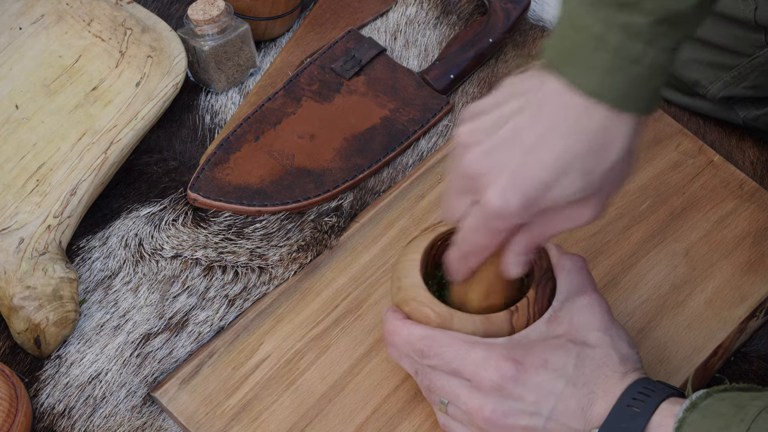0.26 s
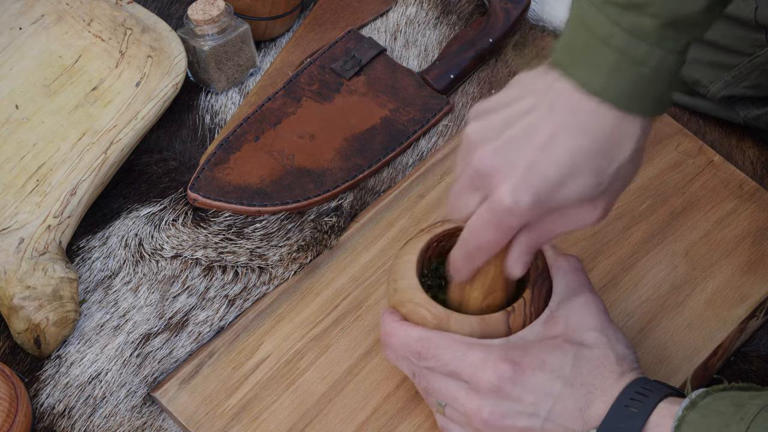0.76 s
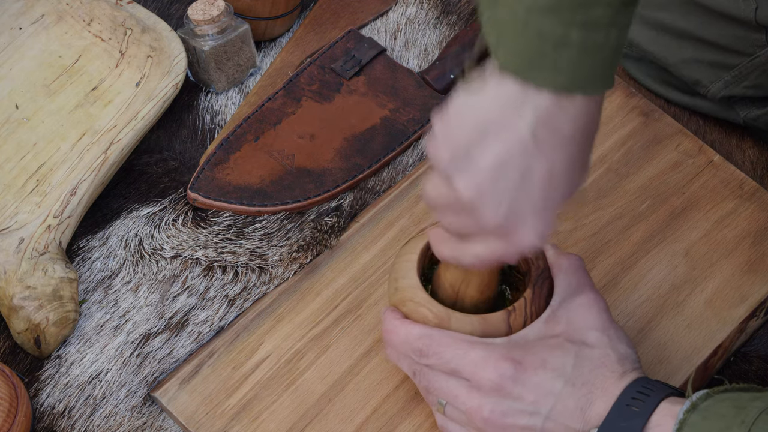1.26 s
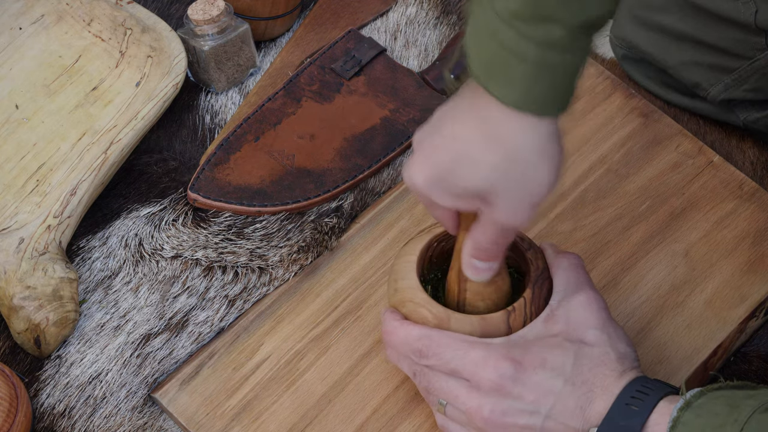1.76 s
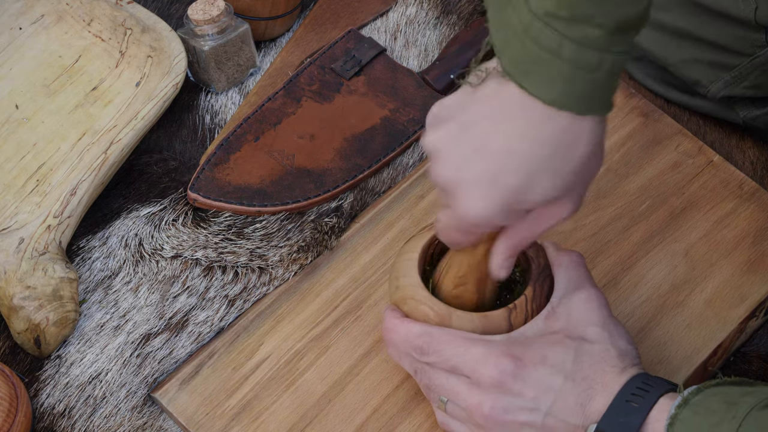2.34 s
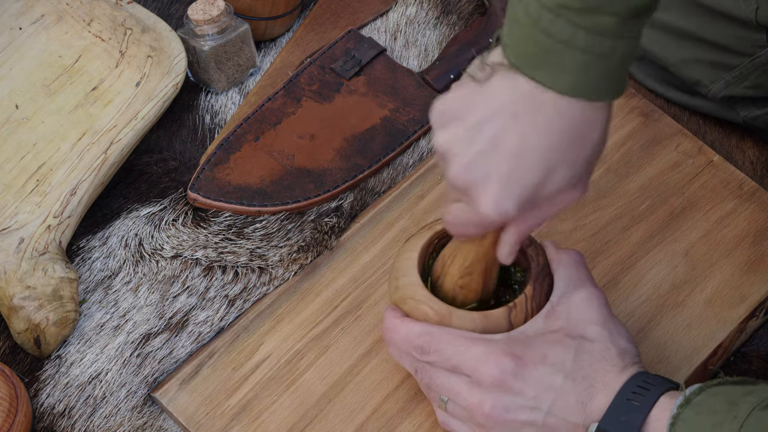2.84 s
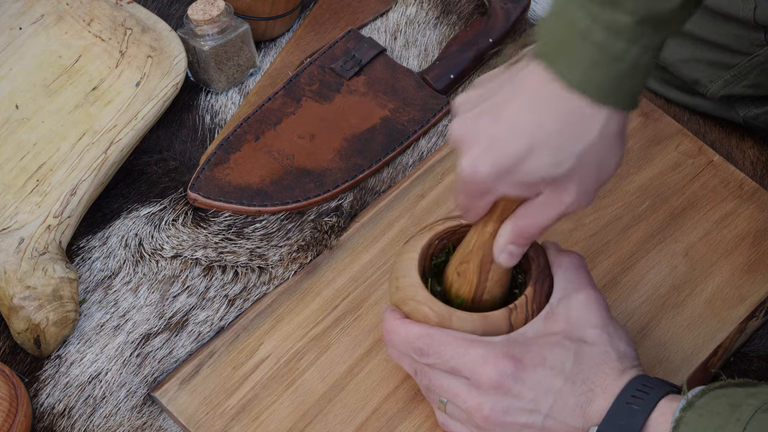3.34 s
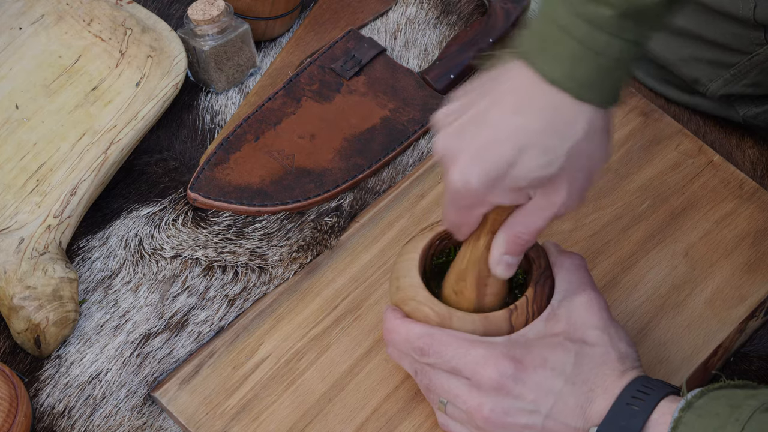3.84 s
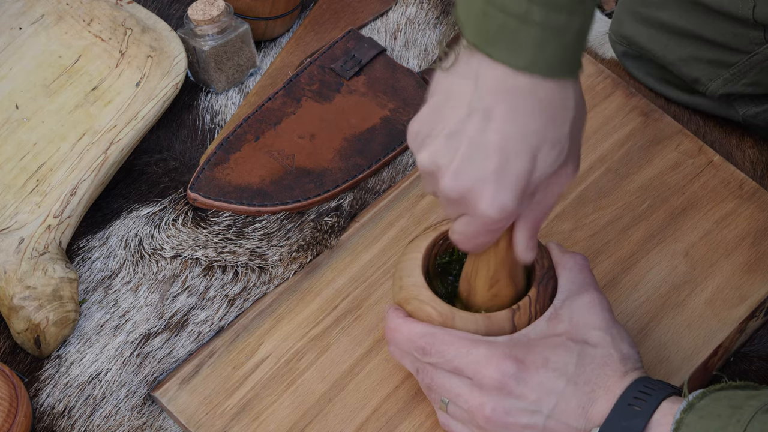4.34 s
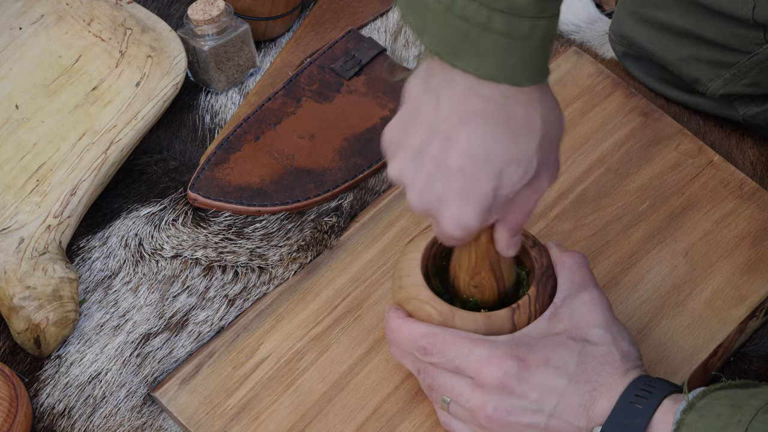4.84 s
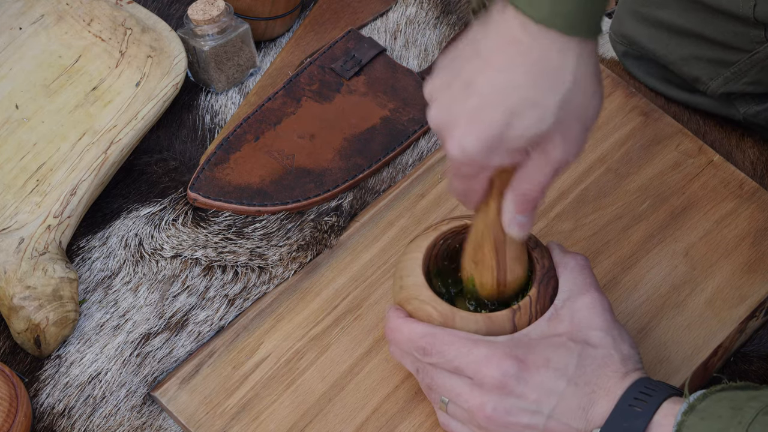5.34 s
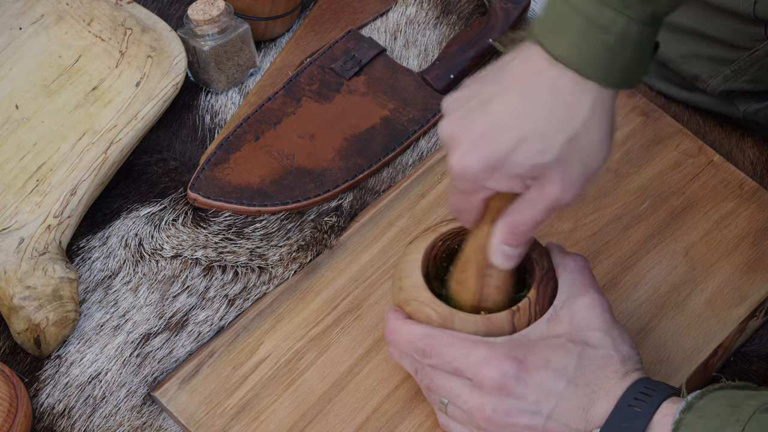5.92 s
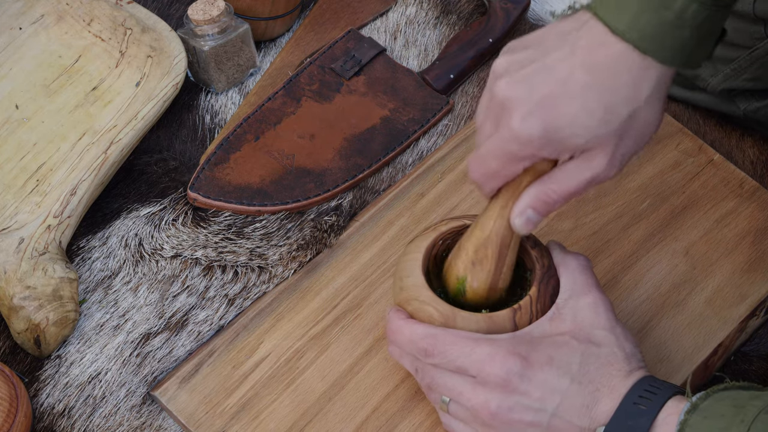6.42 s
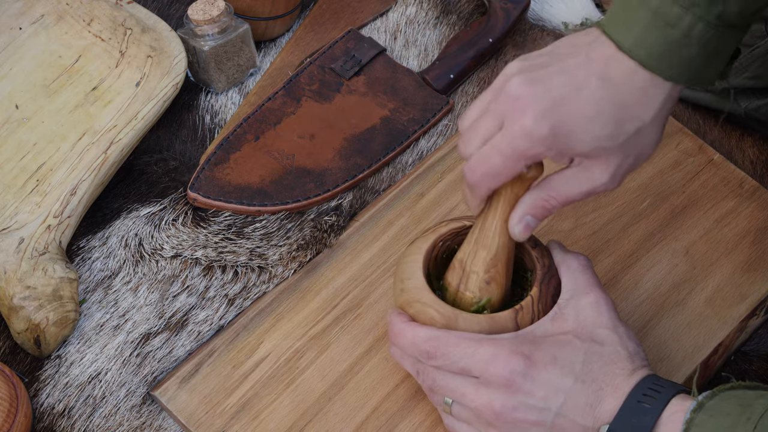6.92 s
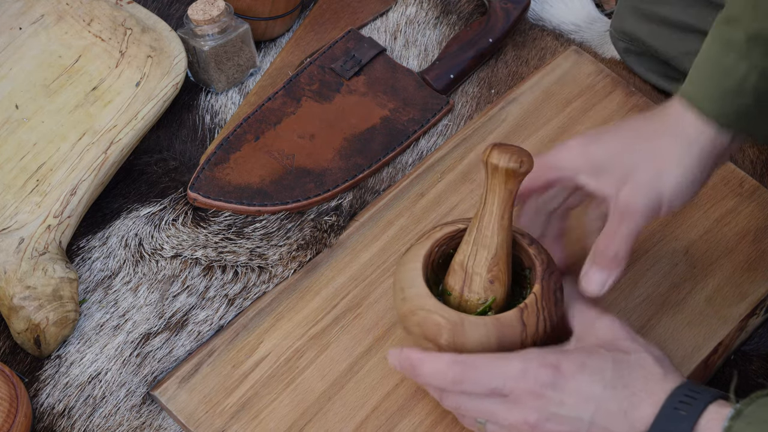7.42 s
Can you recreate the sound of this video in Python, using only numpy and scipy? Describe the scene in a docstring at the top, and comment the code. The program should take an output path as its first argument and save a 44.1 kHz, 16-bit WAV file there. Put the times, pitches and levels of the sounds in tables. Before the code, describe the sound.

A wooden pestle knocks and grinds dry herbs in a small wooden mortar, with crisp leaf crackles over a soft open-air hush.

```python
"""Outdoors, a wooden pestle knocks and grinds dry herbs in a small wooden mortar held on a board.
Knocks set a few short tones ringing, of mortar and board and a low handling thump; grinding is
many tiny clicks ringing the same tones. Leaves and stems snap as short bursts of noise, and crackle
as clicks passed through the bowl's tones.
Behind lies a soft open-air hush of noise, a little to the right."""
import sys
import numpy as np
from scipy import signal
from scipy.io import wavfile

SR = 44100
rng = np.random.default_rng(int(sys.argv[2]) if len(sys.argv) > 2 else 0)


def bounce(signal):
    """Save signal as a 16-bit WAV file at the path given by the first command-line argument."""
    frames = np.transpose(np.atleast_2d(signal))
    limited = np.clip(frames, -1, 1)
    pcm = np.round(limited * 32767).astype(np.int16)
    wavfile.write(sys.argv[1], SR, pcm)


N = 338685   # length in samples

# open-air hush, its tone colour: (f/Hz, relative level per Hz/dB)
HUSH_COLOUR = [(15, -61), (25, -18), (123, 1.5), (184, -13), (415, -10.5), (450, -10.5), (639, -11.5),
               (712, -4.5), (984, -24), (1070, -12), (1780, -11.5), (2800, -16.5), (4590, -23.5),
               (9000, -28), (15900, -32)]
# how alike left and right are in the hush, 1 is the same: (f/Hz, likeness/1)
HUSH_LIKENESS = [(60, 0.97), (240, 0.12), (950, 0.55), (3770, 0.29), (15000, 0.009)]
# how far the hush leans, below 0 is to the right: (f/Hz, left minus right level/dB)
HUSH_LEAN = [(60, -6.5), (380, -4.5), (2380, -5), (15000, -1)]
# tones of mortar and board; the lowest row is a low handling thump:
# (f/Hz, relative level/dB, time to die by 60 dB/s)
KNOCK_TONES = [(54.3, -30, 0.19), (164, -3.5, 0.022), (241.5, 2, 0.034), (381, 0, 0.044), (521.7, 0, 0.021),
               (727.7, 1, 0.029), (1012.5, -0.5, 0.023), (1300, 1, 0.016), (1562, 3.5, 0.0095),
               (2007, 6, 0.005), (2700, -22, 0.011), (3400, -16, 0.025), (3720, -13.5, 0.012),
               (5320, -20, 0.018), (8100, -21.5, 0.015)]
# bowl air and shell colouring the crackle, first four rows coarse, the rest fine:
# (f/Hz, width/Hz, relative level/dB)
BOWL_MODES = [(2600, 300, -8), (3600, 2160, -3), (4470, 1230, -9.5), (5620, 170, -5), (6300, 550, 11),
              (7400, 1800, 9), (9150, 300, -5)]
# idle stirring between pushes: (t/s, wood rumble level/dB)
IDLE_STIRRING = [(0, -67), (1.0, -58.5), (1.15, -64.5), (1.6, -60.5), (2.0, -58.5), (3.3, -66.5),
                 (3.8, -63.5), (4.1, -88), (4.7, -62), (5.15, -74), (6.2, -70), (7.0, -72.5), (7.68, -68)]
# short grinding pushes: (middle t/s, length/s, wood rumble level/dB, leaf crackle level/dB,
# dust hiss level against the crackle/dB)
GRINDING_PUSHES = [(.001,0.037,-42.5,-65,-4),(0.098,0.14,-63,-64,-15),(0.19,0.055,-46.5,-52,-13),(0.26,0.082,-49.5,-64.5,-4),(0.297,0.046,-42.5,-61,-5),(0.35,0.074,-52,-65,-10),
                   (0.414,0.063,-72,-57,-15),(0.485,0.096,-51.5,-56,-31),(0.558,0.041,-50,-59,-2),(0.622,0.09,-53.5,-65,-6),(0.691,0.075,-71,-56.5,-21),(.78,0.053,-55,-62,-18),
                   (0.835,0.078,-47,-67,-8),(0.88,0.018,-47,-49,-9),(0.927,0.044,-53,-57.5,-18),(1.026,0.036,-52,-67,-6),(1.197,0.081,-64,-63.5,-16),(1.332,0.17,-59,-66.5,-5),
                   (1.832,0.032,-46,-61,-6),(2.022,0.054,-67,-58,-18),(2.177,0.14,-55,-64.5,-1),(2.234,0.1,-41.5,-53,-4),(2.331,0.089,-55,-61.5,-11),(2.42,0.13,-54.5,-68,-10),
                   (2.565,0.14,-52,-62,-21),(2.594,0.061,-43.5,-74,11),(2.646,0.057,-47,-50,-14),(2.677,0.03,-47,-50,-16),(2.701,0.16,-51,-57,-21),(2.86,0.21,-56.5,-69.5,-3),(3.026,0.14,-46.5,-61,-6),
                   (3.12,0.081,-51,-57.5,-13),(3.21,0.082,-55,-66,-5),(3.318,0.13,-52.5,-66.5,-7),(3.902,.12,-58,-60,-9),(3.981,0.081,-62,-58.5,-24),(4.281,0.1,-59,-62,0),(4.414,0.13,-54.5,-62.5,-4),
                   (4.6,0.22,-62,-67,-3),(4.787,0.068,-62,-64,1),(4.867,0.11,-68,-61.5,-10),(4.98,0.22,-64.5,-64.5,-12),(5.061,0.15,-54.5,-60.5,-9),(5.42,0.05,-45.5,-78,21),(5.461,0.053,-46.5,-64,2),(5.497,0.059,-44.5,-58.5,-1.5),
                   (5.625,0.1,-51,-66.5,-11),(5.953,0.054,-60,-56,-8),(6.033,0.08,-50.5,-63.5,-15),(7.535,0.64,-71,-71,-3.5)]
# stems and leaves snapping: (t/s, peak level/dB, pitch f/Hz, broad tick level against the ring/dB)
LEAF_SNAPS = [(.027,-45,4700,1),(.126,-50,5000,2),(.1705,-40,3970,2),(.195,-37,3330,-3),(0.2386,-39.5,2600,4),(.259,-43,4930,-2),
              (.2818,-47,6150,-2),(0.2956,-37.5,2860,4),(0.3416,-34.5,3800,7),(0.3653,-43,4140,-16),(.4702,-53,3520,-20),(0.5,-30,8500,-1),(0.534,-40,4700,-6),
              (.5536,-34,7600,9),(.5791,-44,8000,5),(0.612,-49,3930,10),(0.7025,-37,7100,3),(.764,-49,4570,-6),(0.826,-36.5,3160,7),(.868,-33.5,7240,-4),
              (0.8802,-39,4220,-1),(.9142,-53,4580,-8),(.9532,-45,4100,-3),(0.9805,-40.5,4470,0),(1.156,-57,7500,0),(1.186,-55,7400,5),(1.3106,-41.5,4500,2),(1.4284,-39.5,7700,9),(1.681,-46.5,7660,1),
              (1.783,-49,8200,6),(1.82,-48,2700,-5),(1.889,-49.5,4270,-11),(2.0076,-35.5,6600,0),(2.162,-40,2800,7),(2.1882,-35.5,3500,7),
              (2.232,-42,9000,6),(2.249,-45,7000,6),(2.384,-50,2960,-4),(2.432,-49,2600,-14),(2.4717,-46.5,5900,-4),(2.5995,-44,5270,-11),(2.639,-34,7500,0),
              (2.6405,-36.5,2900,-19),(2.7945,-47,7500,4),(2.7837,-45.5,7000,1),(2.9966,-37,8100,-1),(3.047,-30,3050,6),(3.0824,-49,2780,-14),(3.121,-42,4200,-5),
              (3.202,-43.5,3830,-11),(3.2268,-57,10500,8),(3.237,-27.5,2950,8),(3.3273,-47,2700,1),(3.385,-53,7500,1),(4,-48,4560,-6),(4.205,-44,7600,-4),
              (4.386,-50,3520,-5),(4.4423,-42,3470,7),(4.5463,-27,7760,-4.5),(4.619,-50,3760,0),
              (5.014,-48,6300,0),(5.1008,-46,8260,8),(5.1597,-46,2630,2),(5.379,-54,7660,-11),(5.4136,-51,3650,7),(5.426,-40,3600,6),
              (5.495,-43,4220,-11),(5.523,-51,3120,-4),(5.931,-44,3840,14),(5.9573,-39,2870,11),(5.646,-49,6500,6),(6.0145,-47,6300,-7),(6.1899,-35.5,10100,9),
              (6.6711,-38,3480,-14),(6.983,-38.5,2740,13)]
# pestle on mortar: (t/s, relative bowl level/dB, then against the bowl: board thump level/dB,
# rim level/dB, hard edge level/dB)
PESTLE_KNOCKS = [(.031,-51,-4,12,-32),(.174,-38.5,-1,-26,-16),(.193,-40.5,-3,-13,-4),(.237,-43,0,-7,-9),(0.294,-20.5,-11,-18,-38),(.341,-40,-7,16.5,-37),
                 (0.426,-45.5,6.5,-17,-4),(0.447,-55,6,-22,-5),(0.494,-27.5,-20,-51,-16),(0.55,-31.5,-4,-13,-20),(.58,-31,-1.5,-0.5,-18.5),(.615,-33,-12,-7,-31),
                 (0.715,-36.5,-19,-47,-12),(0.765,-37.5,1,-5.5,-17),(0.823,-31,-16,-13,-19),(0.87,-37.5,4,3.5,-36),(.98,-51.5,-2,-17,4.5),
                 (1.016,-49.5,-2,-7,-21),(1.274,-59,15,-13,-10),(1.314,-34.5,0.5,-32,-21),(1.34,-55,-10,4,6.5),(1.428,-45.5,-40,1,-4),(1.549,-47.5,-22,-9,-18),(1.681,-59.5,-10,6,11),(1.782,-58,-16,7,8),(1.816,-44,-41,0,-4),
                 (1.911,-42.5,-17,3,-20),(2.007,-43.5,0,2.5,-10),(2.162,-41.5,-26,-8,-14),(2.187,-25.5,-7,-15.5,-22),(2.214,-44,-19,4,-4),(2.231,-37.5,-19,6.5,-21),
                 (2.249,-37,-37,-5,-5.5),(2.259,-34.5,-48,-3,-17),(2.337,-39.5,-20,-13,-16),(2.437,-46,8,-12,-10),(2.597,-31,-8,-18,-24),(2.643,-37.5,5,5,-2.5),
                 (2.849,-59,15,-18,-15),(2.956,-43.5,-14,-4,-9),(2.997,-26,-42,-11,-11.5),(3.047,-27,0,-3,-15.5),(3.084,-54,-14,21.5,-3),(3.124,-52.5,-26,17,-19),
                 (3.207,-43,-21,-11,-10),(3.236,-43.5,0,8,-11),(3.259,-41.5,-9,1,-45),(3.291,-44,4,2.5,-8),(3.327,-35.5,-25,-15,-18),(4.075,-44.5,-10,-8,-25),
                 (4.208,-39,-5,15.5,-18),(4.321,-63,22,-1,0),(4.383,-56,17,-13,-3),(4.548,-26,-14.5,15,-17),(4.62,-37.5,-3,-10,-32),(4.781,-52.5,4,2,-12),
                 (5.031,-53.5,9.5,-24,1),(5.099,-37,-13,-22,-19),(5.381,-38.5,0,9.5,-5),(5.413,-30.5,-8.5,-6.5,-20),(5.496,-36,-9,-12,-9),(5.52,-32.5,-12,-6.5,-14),
                 (5.603,-45,5,-14,-27),(5.936,-49,-1,-6,-9),(5.965,-41.5,14,4,-10),(6.013,-47,3,-14,-12),(6.03,-47,12,-28,-6),(6.191,-22.5,-3.5,3.5,-25),(6.25,-34,-11,-9,-25),
                 (6.5054,-21,-7,5,-4.5),(6.512,-23.5,-13.5,-9,-13.5),(6.526,-35,-10,-7,-27),(6.671,-21,-3.5,-0.5,-1.5),(6.681,-20.5,-40,3.5,-9.5),(6.846,-57,10.5,-15,-8),
                 (6.983,-25,0,-9.5,-19.5),(7.121,-46.5,-6,-26,-27),(7.486,-46.5,-18,-17,-18)]
# centres of the four parts of a knock, thump, bowl, rim and edge: (f/Hz)
KNOCK_PART_HZ = [230, 430, 900, 1550]

HUSH_DB = -57.42
STIR_CRACKLE_DB, STIR_DUST_DB = -11.5, -12   # crackle against the rumble, dust against the crackle
PUSH_END_DB = -20         # level of a push at its two ends, against its middle
PUSH_SQUARENESS = 2.65    # 2 is a bell, more is flat-topped
FINE_DB, FINE_FOLLOWS_DUST = 1.5, 0.54   # fine crackle against coarse; share of the dust level added
TEAR_MS = 1.694           # the fibres tear this long before they part
SNAP_T60_MS, TICK_T60_MS = 12.7, 5.5     # time to die by 60 dB; the broad tick dies faster
SNAP_PAN_DB, SNAP_PAN_SPREAD_DB = -1.3, 3.7   # mean and scatter of left minus right
BUILD_MS = 2.88           # time the force builds, at 400 Hz and a hard edge of -19 dB
QUICKER_DB_PER_EDGE_DB = 0.18            # a blow with a louder hard edge builds faster
CLACK_T60_S = 0.02


def from_db(db):
    """Turn decibels into gain."""
    return 10 ** (np.asarray(db) / 20)


def rms_one(x):
    """Scale to an average strength (rms) of 1."""
    return x / np.sqrt(np.mean(x ** 2) + 1e-20)


def at_hz(points, hz):
    """Read a table of points at a pitch, on a log-frequency axis."""
    table_hz, values = np.transpose(points)
    return np.interp(np.log(hz), np.log(table_hz), values)


def drift(rate):
    """Slow random wandering of spread 1; rate in Hz sets how fast."""
    r = np.exp(-80 * np.pi * rate / SR)   # one step is 40 samples
    steps = rng.standard_normal(N // 40 + 2002)
    slow = signal.lfilter([1], [1, -2 * r, r * r], steps)[2000:]   # drop the run-in
    return np.interp(np.arange(N) / 40, np.arange(len(slow)), rms_one(slow))


def band(x, low, high):
    """Keep mainly what lies between two frequencies in Hz."""
    return signal.sosfilt(signal.butter(2, [low, high], "band", fs=SR, output="sos"), x)


def ring(clicks, hz, t60):
    """Each click sets off a dying sine, of height about 1 for a unit click."""
    r = from_db(-60 / (t60 * SR))
    w = 2 * np.pi * hz / SR
    return signal.lfilter([0, np.sin(w)], [1, -2 * r * np.cos(w), r * r], clicks + 1e-18)


def resonance(x, hz, width_hz):
    """Favour the sound around one pitch, with a gain of about 1 at the top."""
    r = np.exp(-np.pi * width_hz / SR)
    top = np.array([1, 0, -1]) * (1 - r * r) / 2
    return signal.lfilter(top, [1, -2 * r * np.cos(2 * np.pi * hz / SR), r * r], x)


def grains(per_s, spread_db, clump_db):
    """Random clicks of uneven size, coming in clumps; rms 1."""
    sizes = from_db(spread_db * np.minimum(rng.exponential(1, N), 5)) * rng.choice([-1, 1], N)
    chance = per_s * from_db(clump_db * drift(40)) / SR
    return rms_one(sizes * (rng.random(N) < chance))


def hush():
    """Half-octave bands of stereo noise, each with its own level, likeness, lean and slight flicker."""
    out, together = 0, drift(.5)
    edges = 20 * 2 ** np.arange(0, 10.1, .5)
    white = rng.standard_normal((2, 2, N))
    for k, (low, high) in enumerate(zip(edges, edges[1:])):
        mid, side = band(white[k % 2], low, min(high, .45 * SR))
        hz = np.sqrt(low * high)
        alike = np.clip(at_hz(HUSH_LIKENESS, hz), -1, 1)
        flicker_db = .3 * together + .7 * drift(8)
        lean_db = at_hz(HUSH_LEAN, hz) / 2 * np.array([[1], [-1]])
        gain = from_db(at_hz(HUSH_COLOUR, hz) + flicker_db + lean_db)
        out = out + gain * (np.sqrt(1 + alike) * mid + np.sqrt(1 - alike) * side * [[1], [-1]])
    return from_db(HUSH_DB) * rms_one(out)


def effort():
    """Gains of rumble, coarse crackle, fine crackle and dust: swelling pushes on top of idle stirring."""
    def layer_powers(wood_db, leaf_db, dust_db):
        """Power of the four layers."""
        fine_db = leaf_db + FINE_DB + FINE_FOLLOWS_DUST * dust_db
        return from_db([wood_db, leaf_db, fine_db, leaf_db + dust_db]) ** 2

    t = np.arange(N) / SR
    stir_db = np.interp(t, *np.transpose(IDLE_STIRRING))
    power = layer_powers(stir_db, stir_db + STIR_CRACKLE_DB, STIR_DUST_DB)
    for s, length, *levels_db in GRINDING_PUSHES:
        near = slice(max(int((s - 2 * length) * SR), 0), int((s + 2 * length) * SR))
        from_middle = np.abs(2 * (t[near] - s) / length)   # 1 at either end
        swell = from_db(PUSH_END_DB * from_middle ** PUSH_SQUARENESS) ** 2
        power[:, near] += layer_powers(*levels_db)[:, None] * swell
    return np.sqrt(power)


def crackle(leaves, modes):
    """Leaf clicks dealt to resonances that come and go as the pestle shifts in the bowl."""
    out = 0
    for k, (hz, width_hz, db) in enumerate(modes):
        # pieces lie all over the bowl
        piece = leaves[k % 3] + .5 * leaves[(k + 1) % 3] * [[1], [-.3]]
        coloured = resonance(resonance(piece, hz, width_hz), hz, 3 * width_hz)
        out = out + from_db(db + 2.6 * drift(18)) * coloured
    return rms_one(out)


def grinding():
    """Small slips of the pestle ring the knock tones; crushed leaves crackle in the bowl and dust hisses."""
    wood_gain, coarse_gain, fine_gain, dust_gain = effort()
    slips = grains(900, spread_db=2.0, clump_db=3.0)
    rumble = 0
    for k, (hz, db, t60) in enumerate(KNOCK_TONES):
        gain = from_db(db - 2.65 * np.log2(hz / 400))   # tilted towards the low tones
        rumble = rumble + (-1) ** k * gain * ring(slips, hz, t60)
    leaves = np.array([grains(1200, spread_db=3.5, clump_db=4.0) for piece in range(3)])
    dust = band(leaves[0] + 0.91 * leaves[1:], 9000, 16500)   # left and right partly alike
    return (wood_gain * rms_one(rumble) + coarse_gain * crackle(leaves, BOWL_MODES[:4])
            + fine_gain * crackle(leaves, BOWL_MODES[4:]) + dust_gain * rms_one(dust))


def snaps():
    """A few ms of dying noise: a ring at the pitch of the breaking piece plus a broad tick."""
    out, t = np.zeros((2, N)), np.arange(1200) / SR
    noises = rng.standard_normal((len(LEAF_SNAPS), len(t)))
    pans_db = SNAP_PAN_DB + SNAP_PAN_SPREAD_DB * rng.standard_normal(len(LEAF_SNAPS))
    for (s, peak_db, hz, tick_db), noise, pan_db in zip(LEAF_SNAPS, noises, pans_db):
        tear = noise * np.minimum(1000 * t / TEAR_MS, 1) ** 1.67
        after_ms = np.maximum(1000 * t - TEAR_MS, 0)
        burst = tear * from_db(-60 * after_ms / SNAP_T60_MS)
        crack = tear * from_db(-60 * after_ms / TICK_T60_MS)
        tone = resonance(resonance(burst, hz, 0.1 * hz), hz, 1.0 * hz)
        snap = rms_one(tone) + from_db(tick_db) * rms_one(band(crack, 2300, 12500))
        i = round(s * SR)
        snap = (snap / np.abs(snap).max())[:N - i]
        out[:, i:i + len(snap)] += snap * from_db(peak_db + np.array([[pan_db], [-pan_db]]) / 2)
    return out


def knocks():
    """Each blow rings all tones, varied a little at random in pitch and level; duller blows build slower."""
    out, t = np.zeros(N), np.arange(4000) / SR
    hz, level_db, t60 = np.transpose(KNOCK_TONES)[:, :, None]
    chance = rng.standard_normal((len(PESTLE_KNOCKS), 2, len(KNOCK_TONES), 1))
    grit = band(rng.standard_normal((len(PESTLE_KNOCKS), len(t))), 1500, 5500)
    sign = (-1.) ** np.arange(len(KNOCK_TONES))[:, None]
    for knock, (scatter, detune), noise in zip(PESTLE_KNOCKS, chance, grit):
        s, bowl_db, thump_db, rim_db, edge_db = knock
        # where the blow lands sets how its force is shared among the tones
        colour_db = np.interp(np.log(hz), np.log(KNOCK_PART_HZ), [thump_db, 0, rim_db, edge_db])
        build_s = BUILD_MS / 1000 * from_db(-QUICKER_DB_PER_EDGE_DB * (edge_db + 19))
        build_s = build_s * (400 / hz) ** .5   # low modes build more slowly
        shape = (1 - np.exp(-t / build_s)) ** 2 * from_db(-60 * t / t60)
        size = from_db(bowl_db - 5.5 + colour_db + level_db + 1.43 * scatter)
        size = size / shape.max(axis=1, keepdims=True)
        tones = np.sin(2 * np.pi * hz * (1 + .015 * detune) * t)
        blow = (sign * size * shape * tones).sum(axis=0)
        # the clack of rough grain on grain, rising within 0.68 ms
        clack = noise * np.minimum(t / 0.00068, 1) * from_db(-60 * t / CLACK_T60_S)
        blow += from_db(bowl_db + edge_db - 16.0) * clack
        i = round(s * SR)
        out[i:i + len(t)] += blow[:N - i]
    return out


def scene():
    """Mortar in the middle, hush around it; the microphone cuts the blows' deep bass below about 90 Hz."""
    bass_cut = signal.butter(2, 90, "high", fs=SR, output="sos")
    blows = signal.sosfilt(bass_cut, knocks())
    return hush() + grinding() + snaps() + blows


def band_limit(x):
    """A steep low-pass at the top of the band."""
    return signal.sosfilt(signal.butter(12, 16830, fs=SR, output="sos"), x)


def record(dry):
    """Cut the very top of the treble, from about 16.5 kHz up."""
    top_cut = signal.cheby2(16, 40, 16500, fs=SR, output="sos")
    mix = signal.sosfilt(top_cut, dry)
    return band_limit(mix)


dry = scene()
out = record(dry)
bounce(out)
```